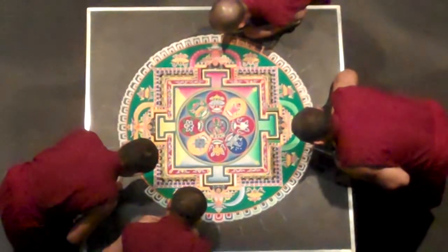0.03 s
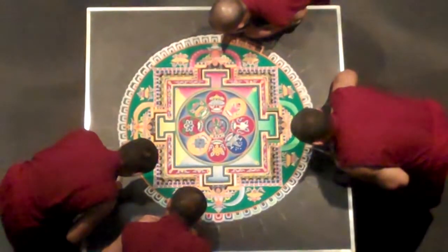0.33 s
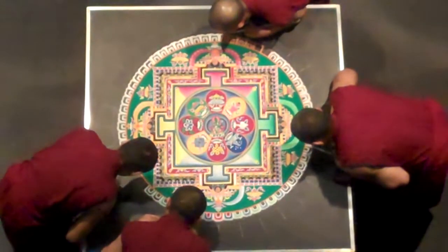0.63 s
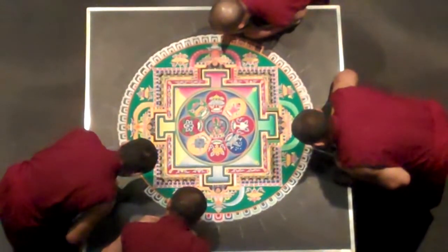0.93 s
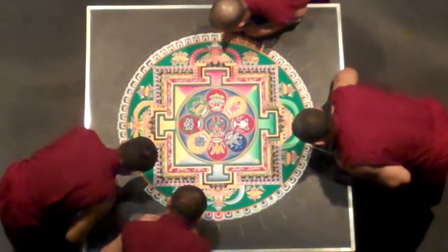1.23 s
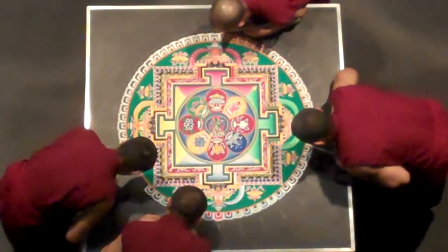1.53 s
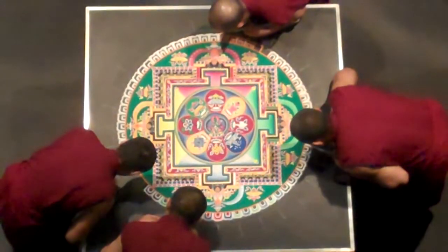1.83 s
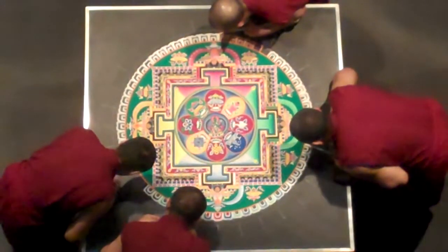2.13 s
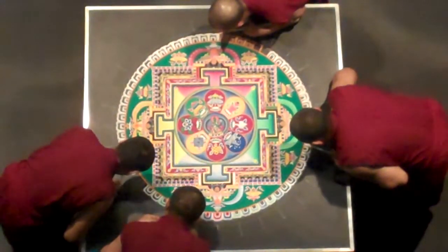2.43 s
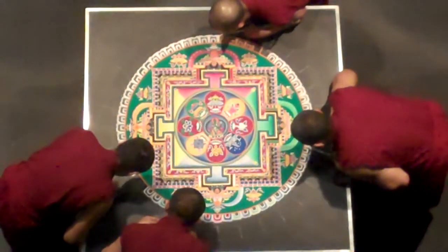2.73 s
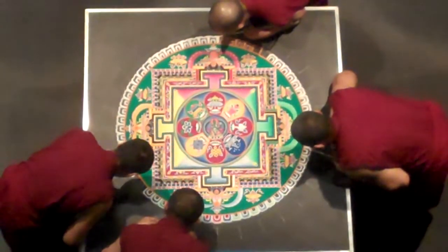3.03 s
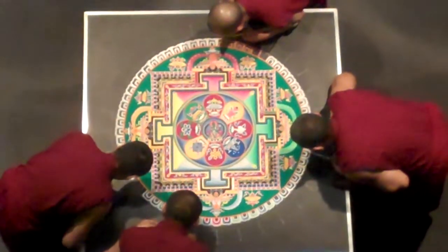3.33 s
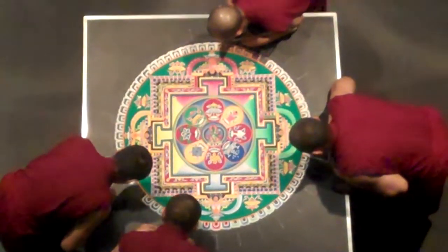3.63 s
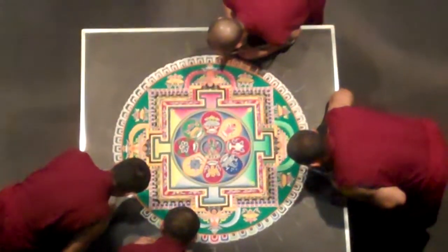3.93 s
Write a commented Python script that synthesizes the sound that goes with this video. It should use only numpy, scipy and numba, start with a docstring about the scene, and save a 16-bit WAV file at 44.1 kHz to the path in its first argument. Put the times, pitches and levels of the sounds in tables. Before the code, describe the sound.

Metal rods rasp rapidly to and fro over ridged sand funnels with a bright ring, two close by and two farther off in a quiet, faintly humming hall. The nearest stops just before the end while the others continue.

```python
"""A metal rod rasps to and fro over the ridges of a sand funnel, about eight strokes a second.
Each ridge gives a click and a scrape that ring the funnel; a bright ring slides as the rod travels.
Four people are laying a sand picture in a quiet hall. The nearest stops near the end; a second, duller
funnel and two far ones rasp on, each at its own pace, over a faint ventilation hum."""
import sys
import numpy as np
from scipy import signal
from scipy.fft import rfft, irfft
from scipy.io import wavfile
from numba import njit

SR = 44100
rng = np.random.default_rng(int(sys.argv[2]) if len(sys.argv) > 2 else 0)


def file_out(sig):
    """Save sig as 16-bit WAV at sys.argv[1]."""
    # one column per channel
    cols = np.atleast_2d(sig).T
    # limit, then scale
    lim = np.clip(cols, -1, 1)
    pcm = np.round(lim * 32767).astype(np.int16)
    wavfile.write(sys.argv[1], SR, pcm)


N = 176400
TIME_S = np.arange(N) / SR


def from_db(db):
    """Decibels to gain."""
    return 10 ** (np.asarray(db) / 20)


def colour(x, spectrum):
    """Zero-phase filter through (frequency [Hz], gain [dB]) points."""
    hz, db = np.transpose(spectrum)
    bins_hz = np.maximum(np.arange(N + 1) * SR / (2 * N), 1)
    gain = from_db(np.interp(np.log(bins_hz), np.log(hz), db))
    return irfft(rfft(x, 2 * N) * gain, 2 * N)[..., :N]


def resonance(x, hz, width_hz):
    """Two-pole band-pass, unity peak gain."""
    r = np.exp(-np.pi * width_hz / SR)
    feedback = [1, -2 * r * np.cos(2 * np.pi * hz / SR), r * r]
    return signal.lfilter(np.array([1, 0, -1]) * (1 - r * r) / 2, feedback, x + 1e-18)


@njit
def sliding_resonance(x, w, r):
    """Two-pole band-pass: moving centre w [rad/sample], pole radius r."""
    y = np.zeros(len(x))
    for i in range(2, len(x)):
        y[i] = (1 - r * r) / 2 * (x[i] - x[i - 2]) + 2 * r * np.cos(w[i]) * y[i - 1] - r * r * y[i - 2]
    return y


def steep_mode(x, hz, width_hz):
    """Two sliding resonances in series, each width_hz wide."""
    w, r = 2 * np.pi * hz / SR, np.exp(-np.pi * width_hz / SR)
    return sliding_resonance(sliding_resonance(x + 1e-18, w, r), w, r)


def highpass(x, hz):
    """Fourth-order Butterworth."""
    return signal.sosfilt(signal.butter(4, hz, "high", fs=SR, output="sos"), x)


def ridges(speed, peak_per_s):
    """Rod crossing ridges: a click and a short scrape each, denser and harder with speed (0 to 1)."""
    jitter_ridges, spread_db, scrape_s, click_share = .07, 1, .00076, .35
    travel_ridges = np.cumsum(np.sqrt(speed) * peak_per_s / SR)
    offset, strength = rng.standard_normal((4000, 2)).T
    hits = np.searchsorted(travel_ridges, np.arange(len(offset)) + jitter_ridges * offset)
    clicks = np.zeros(N + 1)   # last slot takes the ridges never reached
    clicks[hits] = from_db(spread_db * np.clip(strength, -2, 1.5))
    clicks = clicks[:N]
    scrape_envelope = signal.lfilter([1], [1, -np.exp(-1 / (scrape_s * SR))], clicks + 1e-18)
    scrape = scrape_envelope * rng.standard_normal(N) / 10
    force = speed ** 1.38
    contact = (click_share * clicks + (1 - click_share) * scrape) * force
    return contact * np.sqrt(np.mean(force ** 2) / np.mean(contact ** 2))


def rasp(contact, spectrum):
    """Broadband scraping: random signs whiten the contact, the spectrum shapes it."""
    return colour(contact * rng.choice([-1, 1], N), spectrum)


def near_funnel():
    """The contact point weights the funnel's modes; the rod's ring falls on the push, rises on the pull."""
    # pull and push in turn: (start [s], level [dB])
    strokes = [(-.075, -1.5), (.04, -3), (.16, -2.5), (.278, -2.5), (.388, -2), (.505, 0), (0.624, -1.5),
               (.747, -3), (.858, -2.5), (.977, -1.5), (1.085, -1), (1.206, -0.5), (1.32, -2.5), (1.45, -1),
               (1.572, -2), (1.689, -1), (1.805, -1.5), (1.914, 0), (2.038, -4.5), (2.156, 0), (2.279, -2),
               (2.396, -0.5), (2.52, -2.5), (2.651, -2), (2.768, -1.5), (2.889, 0), (3.006, -1),
               (3.125, -1), (3.235, -5), (3.356, -1), (3.468, -1.5), (3.59, -3.5)]
    # funnel modes: (frequency [Hz], width [Hz], push level [dB], pull level [dB],
    # extra at far end [dB], extra at middle [dB], drift as the hold changes [dB/s])
    modes = [(1730, 165, -21.5, -9, -1, -2.5, -0.16), (2270, 113, -18.5, -16, 2, 2, -0.27),
             (2967, 232, -7.5, -7, 3, -0.5, 0), (4105, 197, -5, -7, -2.5, -3.5, -1.5),
             (5507, 150, -4, -2.5, -4.5, -11, 0), (5660, 370, -17.5, -24, 15, -21, 1),
             (6916, 360, -4, -6, 0, -2, 0.5), (8056, 190, -14, -14.5, -1, 9, -0.5),
             (8417, 200, -7, -5, 0.5, -0.5, -0.9), (10870, 126, -23.5, -25, 2, 1.5, 1)]
    # rasp beneath the modes: (frequency [Hz], gain [dB])
    rasp_spectrum = [(600, -62), (1300, -52), (2500, -38), (4800, -37), (6300, -24), (8800, -18),
                     (9800, -40), (14000, -35.5)]
    stop_s, grip_detune = 3.705, .0036
    push_lead, pull_lead = .05, .08   # top speed comes early, in strokes
    rod_near_hz, rod_far_hz = 8810, 6885
    starts_s, stroke_db = np.transpose(strokes)
    swing = np.interp(TIME_S, np.append(starts_s, stop_s), np.arange(len(starts_s) + 1))
    stroke = np.minimum(swing.astype(int), len(starts_s) - 1)
    pushing = stroke % 2 == 1
    swing += np.where(pushing, push_lead, pull_lead) * np.abs(np.sin(np.pi * swing))
    speed = np.abs(np.sin(np.pi * swing))
    contact = ridges(speed, peak_per_s=350) * from_db(stroke_db[stroke])
    place = np.tanh(2.36 * np.cos(np.pi * swing))   # -1 near end, +1 far end
    body = 0
    for hz, width_hz, push_db, pull_db, far_db, middle_db, db_per_s in modes:
        place_db = far_db * place + middle_db * (1 - place ** 2)
        level_db = np.where(pushing, push_db, pull_db) + place_db + db_per_s * TIME_S
        grip = 1 + grip_detune * np.interp(TIME_S, starts_s, rng.standard_normal(len(starts_s)))
        body += steep_mode(contact * from_db(level_db), hz * grip, width_hz)
    rod_hz = rod_near_hz + (rod_far_hz - rod_near_hz) * (1 + place) / 2
    rod_ring = from_db(-5.5) * steep_mode(contact, rod_hz, width_hz=670)
    return body + rod_ring + rasp(contact, rasp_spectrum)


def second_funnel():
    """Coarser, duller rasp: the rod bites at mid-push and glides back lightly."""
    # middle of each push: (time [s], level [dB])
    bites = [(-.04, -29), (0.189, 0), (0.431, -5), (0.579, -2.5), (.8, -1), (1.08, 0.5), (1.309, -2.5),
             (1.531, -1.5), (1.76, -2.5), (2.1, 0.5), (2.391, 0), (2.621, 2), (2.82, -1), (3.05, 1),
             (3.28, 3.5), (3.499, -2), (3.705, -2), (3.916, 1)]
    # funnel modes: (frequency [Hz], width [Hz], level [dB])
    modes = [(1060, 35, -33), (1424, 110, -23), (3590, 77, -15), (5570, 69, -14)]
    # rasp: (frequency [Hz], gain [dB])
    rasp_spectrum = [(500, -63), (1300, -35), (1800, -28.5), (2500, -34), (3600, -33), (4800, -26),
                     (6000, -23.5), (8000, -13), (9300, -35), (14000, -42)]
    return_db = -4
    bite_s, bite_db = np.transpose(bites)
    end_s = 2 * bite_s[-1] - bite_s[-2]
    cycle = np.interp(TIME_S, np.append(bite_s, end_s), np.arange(len(bite_s) + 1))
    velocity = np.cos(2 * np.pi * cycle)
    level_db = np.interp(TIME_S, bite_s, bite_db) + return_db * (velocity < 0)
    contact = ridges(np.abs(velocity), peak_per_s=290) * from_db(level_db)
    rings = sum(from_db(db) * resonance(contact, hz, width_hz) for hz, width_hz, db in modes)
    return rings + rasp(contact, rasp_spectrum)


def far_funnels():
    """Two rods, each rasping at its own unsteady pace and ringing its own funnel."""
    # rods: (pace [strokes/s], peak ridge rate [1/s], level [dB])
    rods = [(7.7, 330, 1.5), (9.4, 420, 6.5)]
    # modes, dealt to the two in turn: (frequency [Hz], width [Hz], level [dB])
    modes = [(5390, 190, -19.5), (4238, 134, -19.5), (2785, 86, -20), (7560, 160, -18.5), (5630, 89, -21),
             (6140, 250, -22), (6960, 77, -10.5), (10950, 58, -29.5)]
    # rasp of both: (frequency [Hz], gain [dB])
    rasp_spectrum = [(400, -51.5), (750, -44.5), (1100, -40), (1650, -31), (2100, -35), (3500, -31),
                     (4800, -30), (5600, -27.5), (7800, -20.5), (9300, -38.5), (14000, -50)]
    # joint envelope: (time [s], level [dB])
    envelope = [(0, -2), (.5, -1), (1, 0), (1.4, 0), (1.8, -1.5), (2.4, 2.5), (3.1, -0.5), (3.6, 2),
                (3.76, -4.5), (3.92, -3.5), (4, -10.5)]
    min_speed = .4   # turns too quick for the rods to rest
    pair = 0
    for k, (strokes_per_s, ridges_per_s, rod_db) in enumerate(rods):
        turns_s = np.cumsum(rng.uniform(.9, 1.1, size=80)) / strokes_per_s - 1 - rng.random()
        swing = np.interp(TIME_S, turns_s, np.arange(len(turns_s)))
        speed = np.maximum(np.abs(np.sin(np.pi * swing)), min_speed)
        contact = ridges(speed, ridges_per_s) * from_db(rod_db)
        pair += rasp(contact, rasp_spectrum)
        for hz, width_hz, db in modes[k::len(rods)]:
            pair += from_db(db) * resonance(contact, hz, width_hz)
    return pair * from_db(np.interp(TIME_S, *np.transpose(envelope)))


def reflections(x, t60_s):
    """Dense echoes: x through two independent, unit-energy decaying noise tails."""
    tails = rng.standard_normal((2, SR)) * from_db(-60 * TIME_S[:SR] / t60_s)
    tails /= np.sqrt(np.sum(tails ** 2, axis=1, keepdims=True))
    return signal.fftconvolve(x[None], tails, axes=1)[:, :N]


def in_hall(x, direct_db, hall_db):
    """Direct sound, scatter off floor and bodies, and hall tail; left and right differ in the treble."""
    direct = from_db(direct_db) * x
    direct_right = direct - 2 * resonance(direct, hz=4720, width_hz=750)   # all-pass
    scatter = from_db(-6.5) * highpass(reflections(direct, t60_s=.04), hz=5240)
    mid, side = reflections(from_db(hall_db) * x, t60_s=.37)
    tail = mid + highpass(side, hz=3040) * [[1], [-1]]
    return np.array([direct, direct_right]) + scatter + tail


def ventilation():
    """Soft air rumble, a steady fan tone and a wavering hum that fades near the end."""
    # hall noise common to both sides: (frequency [Hz], gain [dB])
    mid_spectrum = [(20, -61), (50, -54), (70, -40), (130, -47.5), (320, -45.5), (500, -56), (1000, -45.5),
                    (4000, -75)]
    # hall noise opposed between sides: (frequency [Hz], gain [dB])
    side_spectrum = [(20, -47), (60, -46), (150, -59), (400, -50), (1000, -107)]
    # narrow noise bands of the hum: (frequency [Hz], width [Hz], gain [dB])
    hum_bands = [(255, 22, -45), (383.7, 8, -32)]
    # hum envelope: (time [s], level [dB])
    hum_envelope = [(0, 2), (2.9, 1.5), (3.501, 1), (3.7, -24)]
    fan_hz, fan_db = 74.4, -69.5
    mid, side, drive = rng.standard_normal((3, N))
    hum = sum(from_db(db) * resonance(drive, hz, width_hz) for hz, width_hz, db in hum_bands)
    hum *= from_db(np.interp(TIME_S, *np.transpose(hum_envelope)))
    fan = from_db(fan_db) * np.sin(2 * np.pi * fan_hz * TIME_S)
    return fan + hum + colour(mid, mid_spectrum) + colour(side, side_spectrum) * [[1], [-1]]


def scene():
    """Two funnels close by, two heard mostly by way of the hall, over the ventilation."""
    # shading of the funnels on the right: (frequency [Hz], gain [dB])
    right_shade = [(1100, -1), (2000, 0), (3000, 2), (4150, 1.5), (5400, 4), (6400, -2.5), (7400, -20.5),
                   (8500, -15.5), (11000, -9.5), (13000, -48)]
    near = in_hall(near_funnel() + second_funnel(), direct_db=0, hall_db=-16)
    far = in_hall(far_funnels(), direct_db=-8, hall_db=0)
    left, right = near + far * from_db([[-1], [1]])   # far pair slightly right
    return from_db(-2) * np.array([left, colour(right, right_shade)]) + ventilation()


def record(dry):
    """Steep elliptic low-pass."""
    cutoff_hz = 14250
    return signal.sosfilt(signal.ellip(12, .2, 90, cutoff_hz, fs=SR, output="sos"), dry)


dry = scene()
out = record(dry)
file_out(out)
```